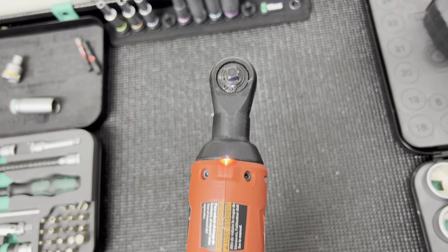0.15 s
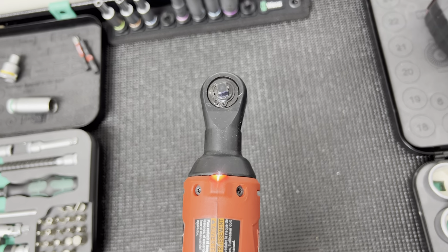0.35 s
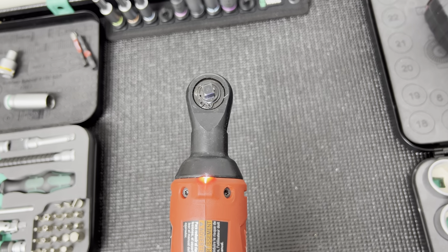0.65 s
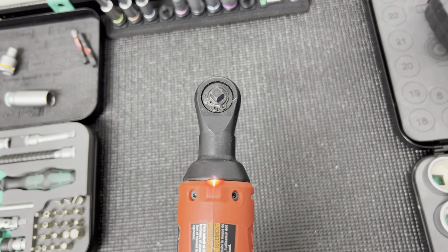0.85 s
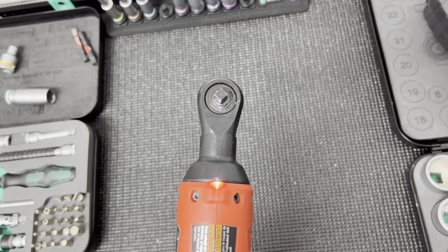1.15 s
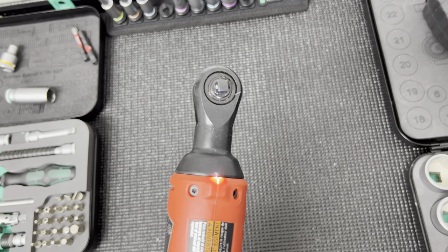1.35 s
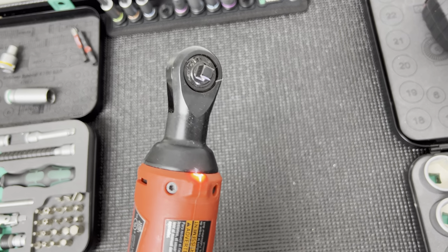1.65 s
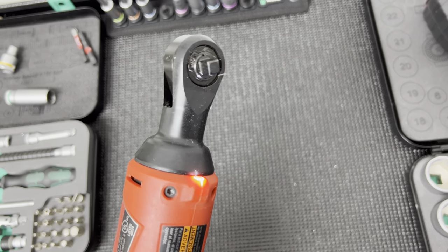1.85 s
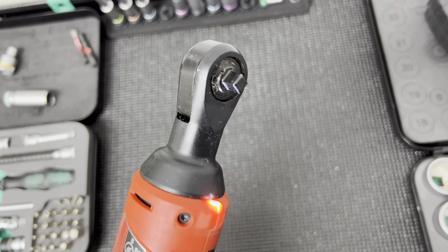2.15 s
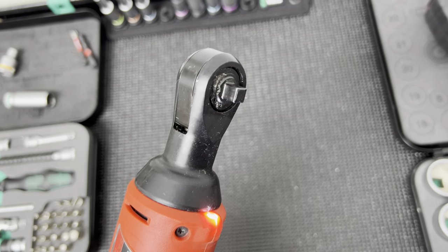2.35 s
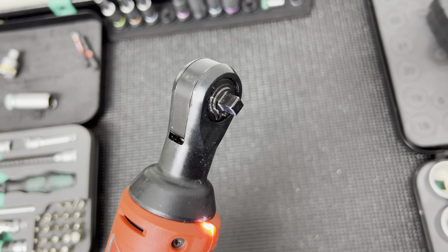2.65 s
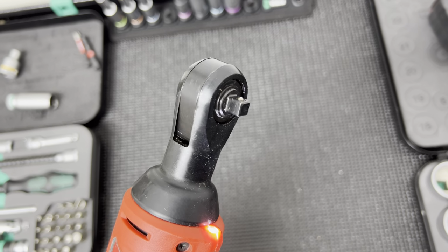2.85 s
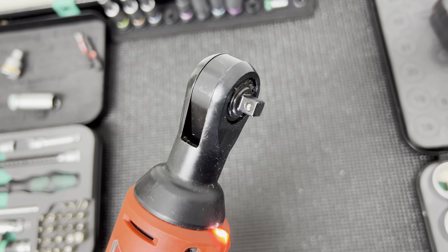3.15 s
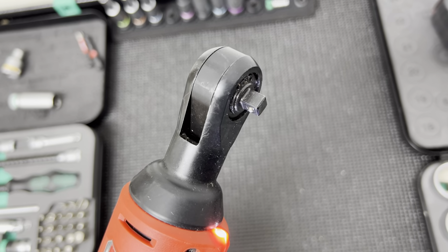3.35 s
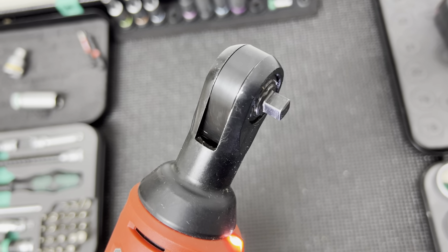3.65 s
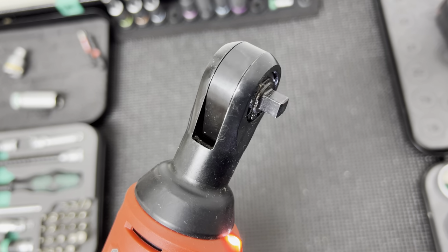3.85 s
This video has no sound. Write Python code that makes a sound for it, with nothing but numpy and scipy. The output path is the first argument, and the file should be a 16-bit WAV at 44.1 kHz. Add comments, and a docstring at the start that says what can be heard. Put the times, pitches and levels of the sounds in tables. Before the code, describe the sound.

A cordless power ratchet whirs up and clacks rapidly, close by, after faint trigger clicks.

```python
"""A cordless ratchet runs free close to a phone held over a workbench. Two faint trigger clicks come first; at a
third the motor controller whistles and the gears whir up. Then each swing of the head gives two pawl ticks, noise
bursts that ring the metal body, and two duller knocks of that body. The wrist soon turns the tool on its side,
which recolours whir and ticks, and near 3 s a gear squeaks twice. Room hiss and handling rumble run throughout."""
import sys
import numpy as np
from scipy import signal
from scipy.fft import rfft, irfft
from scipy.io import wavfile
from scipy.ndimage import uniform_filter1d

SR = 44100
rng = np.random.default_rng(int(sys.argv[2]) if len(sys.argv) > 2 else 0)


def put_to_file(sound):
    """Save the sound as 16-bit audio at rate SR, in the file named by the first command-line argument."""
    columns = np.atleast_2d(sound).T  # one column per channel
    safe = np.clip(columns, -1, 1)
    whole_steps = np.round(safe * 32767)
    wavfile.write(sys.argv[1], SR, whole_steps.astype(np.int16))


def boost(x):
    """Linear amplitude factor 10**(x/20) for a level x in decibels (scalar or array-like)."""
    u = np.asarray(x, float) / 20
    return 10 ** u


N = 176400

# Swings of the head. Each row: start in seconds, first tick in dB before the tick trim, body ring against that
# tick in dB before the ring trim, second tick against the first in dB, knock in dB.
HEAD_SWINGS = [(0.8131, -9.5, -4.5, -2.5, -18), (0.891, -11.5, -4.5, -2.5, -29),
               (0.9502, -12.5, -3.5, -1.5, -41), (1.0046, -10, -8, -0.5, -39), (1.0565, -10.5, -8, 1, -42),
               (1.106, -12.5, -6.5, -3, -16), (1.1577, -10.5, -10, -3, -17.5),
               (1.2139, -12.5, -8, 2.5, -17.5), (1.277, -13, -4.5, 4, -17.5), (1.347, -10.5, -3.5, 0, -25),
               (1.4235, -9, -7.5, 0, -22), (1.5077, -10.5, -6, 0, -21.5), (1.5965, -12, -5, 5, -20),
               (1.6911, -11.5, -6.5, 3, -22.5), (1.7926, -9.5, -4.5, -2, -18.5),
               (1.9015, -6.5, -10, -3, -22.5), (2.014, -9, -9.5, -1.5, -21.5),
               (2.1313, -9, -14, 0.2, -22.5), (2.245, -9, -11.5, -2, -25), (2.352, -10, -15.5, 2, -23.5),
               (2.455, -8, -11.5, -2.5, -23), (2.5535, -6.5, -14, -3, -26.5),
               (2.6493, -6.5, -14.5, -6.5, -29), (2.7436, -10.5, -11.5, -1.5, -26.5),
               (2.8294, -12, -9.5, 1, -21.5), (2.9082, -11, -11, 1, -23.5), (2.9817, -7, -14.5, -6, -17.5),
               (3.0528, -9.5, -15.5, 0.5, -17.5), (3.1205, -11, -19, -3, -19),
               (3.1874, -10.5, -12.5, -1, -23), (3.2532, -10, -10.5, 0.5, -36),
               (3.3176, -9.5, -11, -2.5, -28), (3.3802, -5.5, -12.5, -4, -27),
               (3.4435, -10.5, -15.5, -4, -18.5), (3.5066, -9.5, -13, -5, -16),
               (3.569, -7.5, -18, -4.5, -14.5), (3.6317, -8, -13, 2, -39), (3.6946, -7.5, -12, -0.5, -21),
               (3.7577, -11.5, -26, -0.5, -21), (3.8228, -11.5, -22, -3, -17),
               (3.887, -7.5, -16.5, -5, -20.5), (3.9516, -6.5, -19, -5, -39)]
START_S = 0.706  # the motor switches on
TURN_S, TURN_TAKES_S = 1.44, 0.4  # the wrist turns the tool on its side


def evened(x):
    """Scales to rms 1."""
    return x / np.sqrt(np.mean(x ** 2) + 1e-20)


def read(points, hz):
    """Reads a table on a log-frequency axis."""
    f, value = np.transpose(points)
    return np.interp(np.log(hz + 1), np.log(f + 1), value)


def add(mix, s, sound):
    """Mixes a sound in at s seconds, cut off at the end of the mix."""
    part = mix[round(s * SR):][:len(sound)]
    part += sound[:len(part)]


def causal(points):
    """Minimum-phase impulse response of a spectrum, energy 1."""
    hz = abs(np.fft.fftfreq(2048, 1 / SR))
    log_gain = np.log(boost(read(points, hz)))
    taps = np.fft.ifft(np.exp(np.conj(signal.hilbert(log_gain)))).real[:1024]
    return taps / np.linalg.norm(taps)


def drift(per_s):
    """Slow chance of rms 1: per_s random points a second, joined by straight lines."""
    steps = rng.standard_normal(N * per_s // SR + 2)
    return evened(np.interp(np.arange(N) * per_s / SR, np.arange(len(steps)), steps))


def swing_ends():
    """Swing times with one more at the last pace."""
    s = np.array(HEAD_SWINGS)[:, 0]
    return np.append(s, 2 * s[-1] - s[-2])


def tick(s, db):
    """The pawl snaps over a tooth: a burst, one bounce and a short chatter, as a thin snap over a fuller clack."""
    # Colour of the thin snap. Each row: frequency in Hz, relative level in dB.
    snap_colour = [(8500, -39), (10200, -13.5), (11500, -2), (13000, 10.5), (14300, -1.5), (16300, -14),
                   (17100, -41)]
    # Colour of the fuller clack. Each row: frequency in Hz, relative level in dB.
    clack_colour = [(500, -16.5), (2000, -12), (4600, -4), (6500, 1), (7800, -2), (9300, -9.5),
                    (11000, -14), (14000, -35)]
    lag_s, width_s = 0.0016, 0.0003
    bounce_s, bounce_db, bounce_width_s = 0.002, -17, 0.001
    chatter_db, chatter_t60_s = -20, 0.026
    tick_db, clack_db, flat_db = 4.5, -10, -1.5  # flat_db: the clack is weaker before the tool is turned

    t = np.arange(1200) / SR - lag_s
    burst = np.exp(-(t / width_s) ** 2)
    bounce = boost(bounce_db) * np.exp(-((t - bounce_s) / bounce_width_s) ** 2)
    chatter = boost(chatter_db - 60 * abs(t) / chatter_t60_s) * (t > 0)
    drive = rng.standard_normal(1200) * (burst + bounce + chatter)
    snap = np.convolve(drive, causal(snap_colour)[:256])
    clack = np.convolve(drive, causal(clack_colour)[:256])
    still_flat = np.clip(1 - (s - TURN_S) / TURN_TAKES_S, 0, 1)
    clack_gain = boost(clack_db + flat_db * still_flat)
    return boost(db + tick_db) * (snap / abs(snap).max() + clack_gain * clack / abs(clack).max())


def ring(db, rise_s):
    """One blow on the metal head and shell: decaying modes, each a little different each time."""
    # Modes of head and shell. Each row: frequency in Hz, relative level in dB, t60 in seconds.
    body_modes = [(619, -8.5, 0.013), (890, -9, 0.02), (1084, 1, 0.023), (1308, -13, 0.052),
                  (1580, 1.5, 0.013), (2355, 12, 0.0056), (2632, 3, 0.017), (2980, 0.5, 0.013),
                  (3348, -5, 0.014), (4190, -1.5, 0.011), (5990, 0.5, 0.0075)]
    detune, scatter_db = 0.025, 3  # rms spread of pitch (as a fraction) and of level
    t = np.arange(1800) / SR
    hz, mode_db, t60 = np.transpose(body_modes)[:, :, None]
    louder, sharper, phase = rng.standard_normal((3, len(body_modes), 1))
    fading = boost(mode_db + scatter_db * louder - 60 * t / t60)
    modes = fading * np.sin(2 * np.pi * hz * (1 + detune * sharper) * t + 3 * phase)
    return boost(db) * 0.09 * evened(modes.sum(0) * np.minimum(t / rise_s, 1) ** 2)


def head():
    """Each swing snaps the pawl twice, ringing the body, then knocks the body and knocks it softer on return."""
    second_at, knock_at, return_at = 0.147, 0.385, 1  # places as fractions of the swing
    return_db = -6  # return knock against the knock
    ring_db, ring_lag_s = 1, 0.002
    ring_rise_s, knock_rise_s = 0.0018, 0.0035  # the slower rise makes the knock duller
    ticks, body = np.zeros(N), np.zeros(N)
    for row, length in zip(HEAD_SWINGS, np.diff(swing_ends())):
        s, first_db, body_db, second_db, knock_db = row
        for at, hit_db in ((s, first_db), (s + second_at * length, first_db + second_db)):
            add(ticks, at, tick(at, hit_db) if at == s else tick(s, hit_db))
            add(body, at + ring_lag_s, ring(first_db + body_db + ring_db, ring_rise_s))
        add(body, s + knock_at * length, ring(knock_db, knock_rise_s))
        add(body, s + return_at * length, ring(knock_db + return_db, knock_rise_s))
    return ticks + body


def gears():
    """Tooth rattle and hiss through the housing, with wavering mesh tones locked to the swing rate."""
    # Course of the whir. Each row: time in seconds, level in dB before whir_db.
    whir = [(0.71, -49.5), (0.76, -45.5), (0.85, -37.5), (0.93, -37), (1.21, -39.5), (1.48, -42),
            (1.91, -42.5), (2.14, -42), (2.85, -41.5), (3.0, -40), (3.51, -39), (4.0, -38)]
    # Housing colour before the turn. Each row: frequency in Hz, relative level in dB.
    housing_flat = [(250, -31.5), (450, -18.5), (800, -6.5), (1100, -5.5), (1600, -1.5), (2000, -8),
                    (2600, -7), (3600, -5), (5000, -11.5), (9000, -24), (13000, -13), (17000, -59)]
    # Housing colour once on its side. Each row: frequency in Hz, relative level in dB.
    housing_side = [(250, -30), (350, -7.5), (520, -9), (560, 1), (610, -6), (790, -1.5), (840, 4.5),
                    (900, -3.5), (1080, 5), (1350, -2.5), (2700, -6), (4800, -8), (7500, -11.5),
                    (9300, -23), (13000, -7), (14800, -24), (17000, -56)]
    # Mesh tones. Each row: multiple of the swing rate, level in dB, frequency in Hz under which it is silent.
    mesh_tones = [(26.2, -59, 390), (39.3, -52, 410), (52.4, -45, 730), (65.5, -55, 500)]
    spin_up_s, whir_db = 0.09, 1
    teeth_per_s, spread_db, smooth_share = 2000, 2, 0.35  # teeth a second at 14 swings a second
    waver, flutter_db = 0.008, 4  # rms of pitch (as a fraction) and of level

    t, s = np.arange(N) / SR, swing_ends()
    on = np.clip((t - START_S) / spin_up_s, 0, 1)
    pace = np.interp(t, (s[1:] + s[:-1]) / 2, 1 / np.diff(s))
    rate = uniform_filter1d(pace, 2000) * on  # swings a second

    struck = rng.random(N) < teeth_per_s * rate / 14 / SR
    teeth = boost(spread_db * np.minimum(rng.exponential(1, N), 4)) * struck
    rough = evened(teeth * rng.standard_normal(N))
    drive = smooth_share * rng.standard_normal(N) + (1 - smooth_share) * rough

    turned = np.pi / 2 * np.clip((t - TURN_S) / TURN_TAKES_S, 0, 1)
    flat = evened(signal.oaconvolve(drive, causal(housing_flat))[:N])
    side = evened(signal.oaconvolve(drive, causal(housing_side))[:N])
    rattle = flat * np.cos(turned) ** 2 + side * np.sin(turned) ** 2
    rattle *= boost(np.interp(t, *np.transpose(whir)) + whir_db)

    mesh = np.zeros(N)
    for multiple, db, low_hz in mesh_tones:
        level = boost(db + flutter_db * drift(40))
        fade = np.clip((multiple * rate / low_hz - 1) * 8, 0, 1)
        turns = np.cumsum(rate * (1 + waver * drift(40))) / SR
        mesh += level * fade * np.sin(2 * np.pi * multiple * turns)
    return np.minimum(on * 8, 1) * rattle + on ** 2 * mesh


def controller():
    """The chopped motor current whistles at a fixed pitch; low harmonics flutter and surge most at switch-on."""
    # Whistle partials. Each row: harmonic number, level in dB before surge and flutter.
    chop = [(1, -54), (2, -52), (3, -64), (4, -50), (5, -66), (6, -65)]
    chop_hz, flutter_db = 1828.7, 3.5
    inrush_db, inrush_s = 8, 0.1
    t = np.arange(N) / SR - START_S
    surge_db = inrush_db * np.exp(-np.maximum(t, 0) / inrush_s)
    tones = np.zeros(N)
    for k, db in chop:
        level = boost(db + (surge_db + flutter_db * drift(30)) / np.sqrt(k))
        tones += level * np.sin(2 * np.pi * (k * chop_hz * t + rng.random()))
    return tones * np.clip(t / 0.0058, 0, 1)


def trigger():
    """Small dull plastic clicks: short decaying noise with a soft onset."""
    # Clicks of the trigger. Each row: start in seconds, peak in dB.
    clicks = [(0.44, -40), (0.602, -43), (0.716, -37.5)]
    # Colour of the plastic. Each row: frequency in Hz, relative level in dB.
    click_colour = [(500, -23), (1080, 5), (1500, -5), (2400, -10), (4000, -20), (9000, -30), (12000, -48)]
    t60_s, rise_s = 0.021, 0.0023
    out, t = np.zeros(N), np.arange(1500) / SR
    for s, db in clicks:
        burst = rng.standard_normal(1500) * boost(-60 * t / t60_s) * np.minimum(t / rise_s, 1)
        click = np.convolve(burst, causal(click_colour))
        add(out, s, boost(db) * click / abs(click).max())
    return out


def squeaks():
    """A gear squeaks: brief pure tones that swell and fade."""
    # Squeaks. Each row: start in seconds, level in dB, pitch in Hz.
    gear_squeaks = [(3.085, -32.5, 1936), (3.155, -31, 2000)]
    length_s = 0.017
    out, t = np.zeros(N), np.arange(0, length_s, 1 / SR)
    for s, db, hz in gear_squeaks:
        add(out, s, boost(db) * np.sin(np.pi * t / length_s) * np.sin(2 * np.pi * hz * t))
    return out


def tail(seconds):
    """Dense random reflections, each band dying at its own speed, energy 1."""
    # Decay of the room. Each row: frequency in Hz, t60 in seconds.
    room = [(300, 0.4), (1200, 0.35), (4000, 0.18), (13000, 0.11)]
    hz, t, z = signal.stft(rng.standard_normal(int(seconds * SR)), SR, nperseg=128)
    fading = boost(-60 * t / read(room, hz)[:, None])
    out = signal.istft(z * fading, SR, nperseg=128)[1]
    return out / np.linalg.norm(out)


def scattered(x):
    """The same sound over short paths that shift as the hands move: slowly wandering phases per band."""
    z = signal.stft(x, nperseg=256, noverlap=192)[2]
    wander = rng.standard_normal((z.shape[1], 129, 2)).T
    wander = uniform_filter1d(wander, size=5, axis=1)  # over bands
    a, b = uniform_filter1d(wander, size=30, axis=2)  # over time
    return signal.istft(z * np.exp(1j * np.arctan2(a, b)), nperseg=256, noverlap=192)[1][:N]


def ports(x):
    """Two microphone ports: a shared path with a phase lead, and a scattered path from the bench that differs."""
    # Likeness of the two ports. Each row: frequency in Hz, likeness from 0 to 1.
    same = [(300, .25), (700, .45), (1100, .93), (2000, .93), (3000, .5), (3800, .25), (5000, .65),
            (5700, .85), (6800, .97), (9000, .8), (11400, .98), (13400, .998), (15800, .92)]
    # Phase between the ports. Each row: frequency in Hz, radians by which left leads.
    lead = [(700, .1), (2600, .3), (3600, 0), (4600, -1.4), (5000, -2.8), (5300, 0), (7000, -.25),
            (8600, -1.1), (9500, -1.1), (12400, -2.5), (14500, -3.2)]
    # Balance of the ports. Each row: frequency in Hz, left minus right in dB.
    tilt = [(1500, 0), (2400, 1.5), (3200, 0.5), (4500, 2), (8000, 0.1), (13000, 0.5)]
    hz = np.fft.rfftfreq(N, 1 / SR)
    half = np.arccos(np.clip(read(same, hz), -1, 1)) / 2
    turn = np.exp(0.5j * read(lead, hz)) * boost(read(tilt, hz) / 2)
    shared = rfft(x) * np.cos(half)
    differing = rfft(scattered(x)) * np.sin(half)
    return irfft(np.array([(shared + differing) * turn, (shared - differing) / turn]), N)


def hiss(points, same):
    """Coloured noise of rms 1 in two partly alike channels."""
    a, b = rng.standard_normal((2, N))
    pair = np.array([a, same * a + np.sqrt(abs(1 - same ** 2)) * b])
    gain = boost(read(points, np.fft.rfftfreq(N, 1 / SR)))
    return evened(irfft(rfft(pair) * gain, N))


def air():
    """Quiet room hiss and the low rumble of the hand-held phone, both coloured noise that swells slowly."""
    # Colour of the room hiss. Each row: frequency in Hz, relative level in dB per Hz.
    air_colour = [(120, -32), (200, 0), (261, -25), (330, -11), (560, -14.5), (745, -21), (1650, -29),
                  (1950, -18), (2400, -31.5), (7120, -32.5), (9470, -41), (11900, -40), (14000, -54)]
    # Course of the handling rumble. Each row: time in seconds, level in dB before the swell.
    rumble = [(0.0, -72.5), (1.0, -61.5), (1.4, -75.5), (4.0, -70.5)]
    # Colour of the rumble. Each row: frequency in Hz, relative level in dB per Hz.
    rumble_colour = [(12, -42), (20, -44), (40, -5), (81, -0.5), (135, -2.5), (167, -9.5), (201, -19.5),
                     (260, -11), (340, -31), (570, -120)]
    air_db, swell_db = -73.5, -2.5  # swell_db is the rumble's; the hiss swells by 1 dB rms
    rumble_db = np.interp(np.arange(N) / SR, *np.transpose(rumble)) + swell_db * drift(12)
    room_hiss = boost(air_db + drift(8)) * hiss(air_colour, 0.14)
    return room_hiss + boost(rumble_db) * hiss(rumble_colour, 0.75)


def scene():
    """The tool, its reflections and the room air at the phone's two ports."""
    room_db, low_cut_hz = -15, 365
    small = signal.butter(4, low_cut_hz, "high", fs=SR, output="sos")  # the tool radiates no bass
    tool = signal.sosfilt(small, head() + gears() + controller() + trigger() + squeaks())
    delayed_tail = np.append(np.zeros(260), tail(0.4))  # reflections start 260 samples late
    wet = signal.fftconvolve(tool, delayed_tail)[:N]
    return ports(tool + boost(room_db) * wet) + air()


def top_cut(x):
    """Nothing passes above the cut-off."""
    return signal.sosfilt(signal.butter(12, 17140, fs=SR, output="sos"), x)


def record(dry):
    """The finished mix as the phone stores it."""
    return top_cut(dry)


dry = scene()
out = record(dry)
put_to_file(out)
```